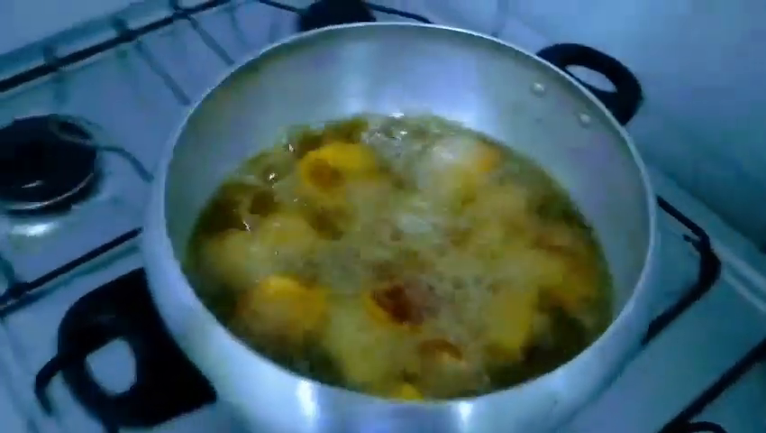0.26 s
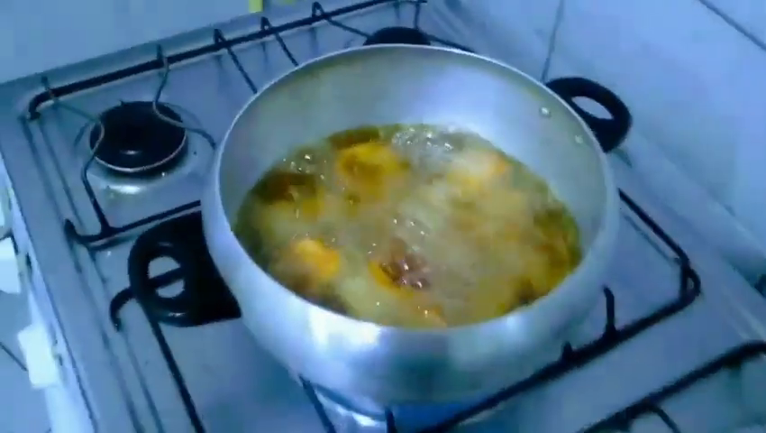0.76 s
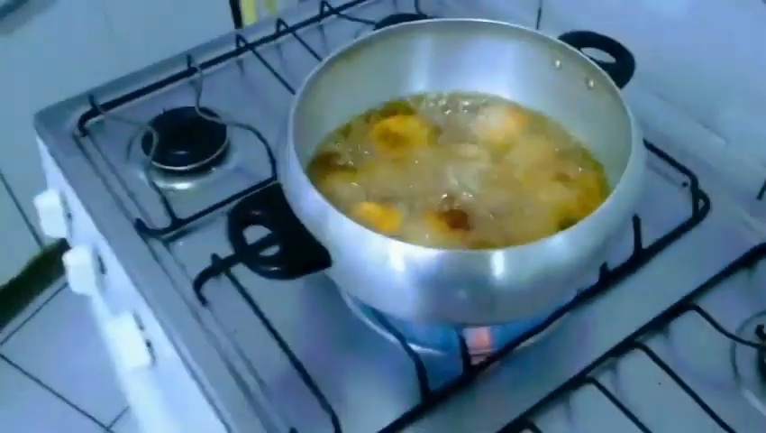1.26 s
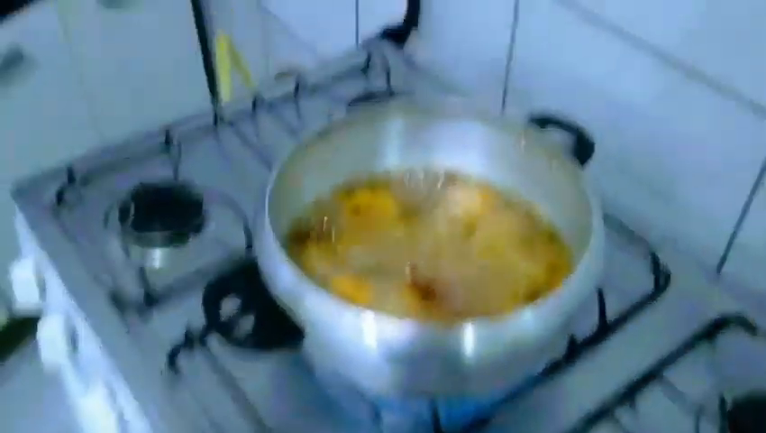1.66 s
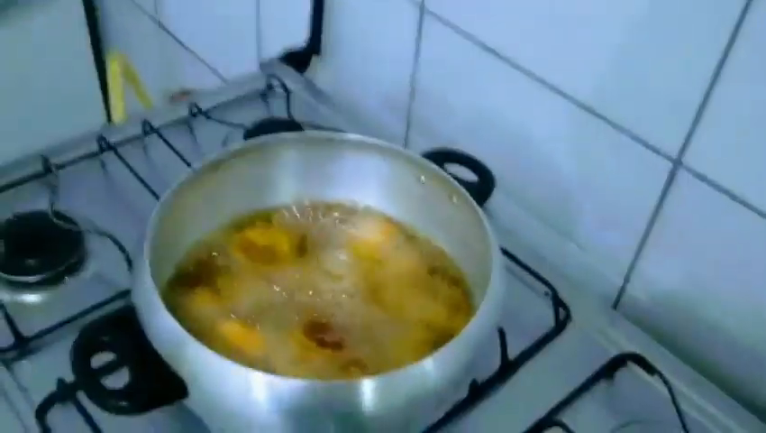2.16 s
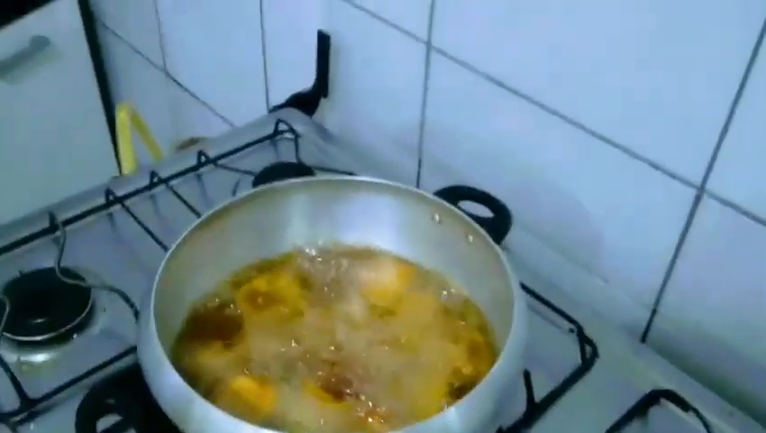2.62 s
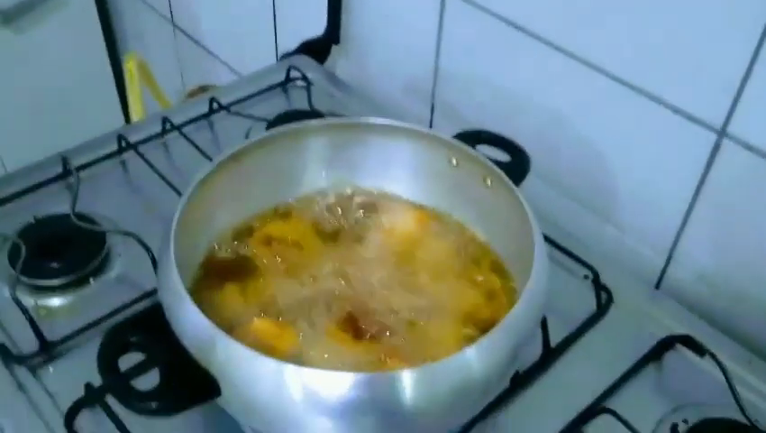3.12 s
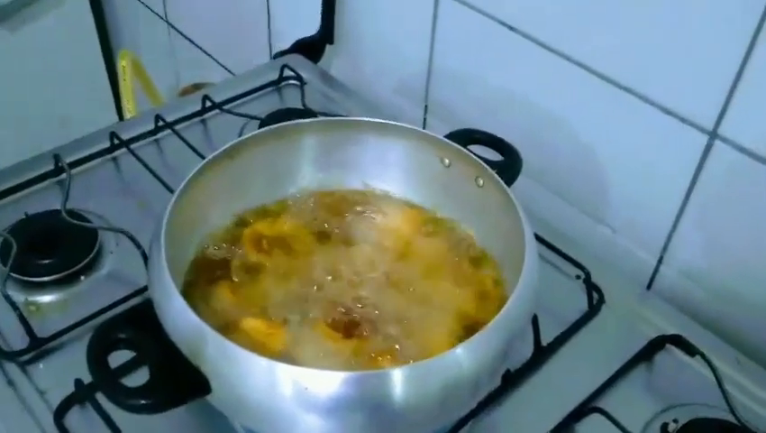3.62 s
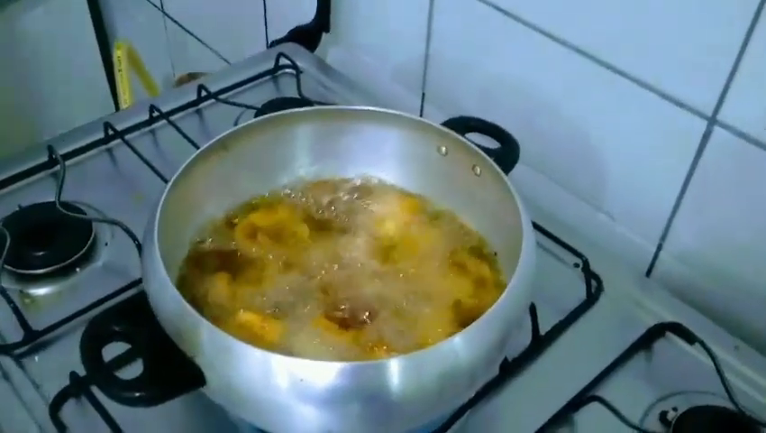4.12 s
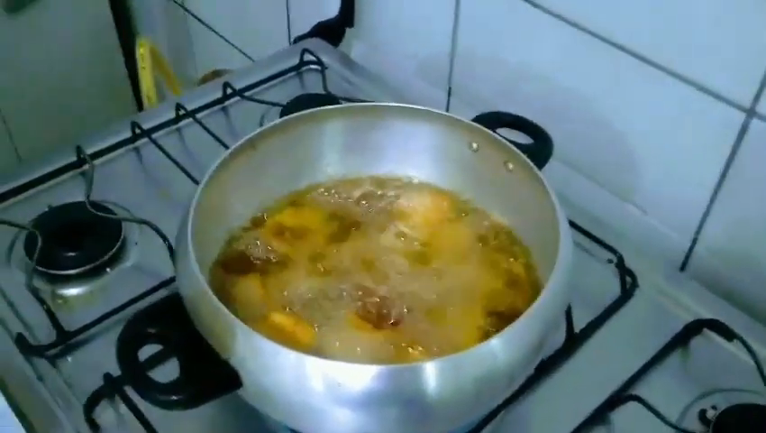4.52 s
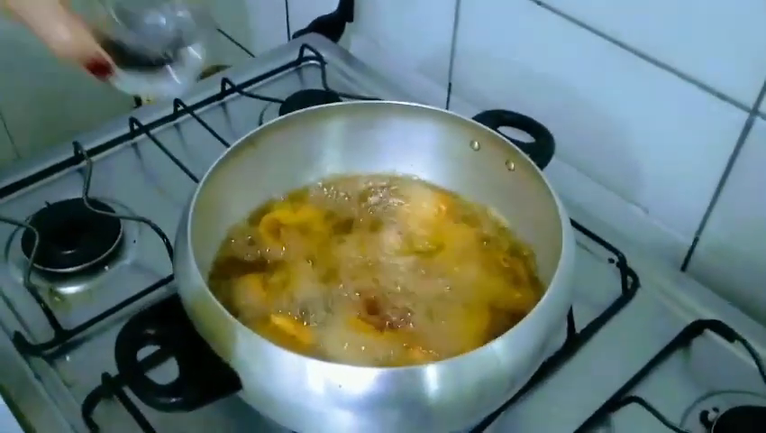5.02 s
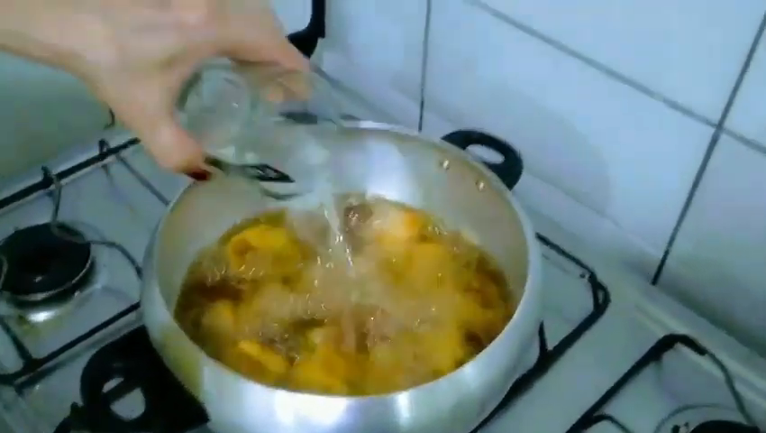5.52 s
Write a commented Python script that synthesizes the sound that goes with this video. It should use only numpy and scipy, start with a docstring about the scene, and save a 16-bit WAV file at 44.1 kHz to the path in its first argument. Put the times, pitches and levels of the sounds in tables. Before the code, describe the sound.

Chunks of food fry vigorously in a deep metal pot on a home stove. Constant bright sizzle and dense fine crackle carry snapping pops and hollow, wet bubbling. A faint metallic ring fades at the start. Near the end water is poured in and the frying jumps to a louder hiss and gurgle. Close handheld stereo microphones, treble-limited, with slight handling bumps and short tiled-wall reflections.

```python
"""Food fries in a deep metal pot: steam bubbles of every size burst in the oil, small ones crackle, large ones gurgle.
Noise bands and swarms of short decaying tones make the sizzle; listed bursts make the loud pops and gulps.
A struck metal rim, a set of wavering partials, still rings at the start; at the end water is poured in
and flashes to hissing steam. Around it lie kitchen rumble, mains hum and handling bumps.
Two spaced microphones of opposite polarity hear it from either side, some 15 cm of sound path apart."""
import sys
import numpy as np
from scipy import signal
from scipy.fft import rfft, irfft, next_fast_len
from scipy.io import wavfile
from scipy.ndimage import uniform_filter1d, map_coordinates

SR = 44100
rng = np.random.default_rng(int(sys.argv[2]) if len(sys.argv) > 2 else 0)


def store_pcm(level_fs):
    """Save levels as 16-bit WAV."""
    pcm = np.round(np.clip(level_fs, -1, 1) * 32767).astype(np.int16)
    wavfile.write(sys.argv[1], SR, np.atleast_2d(pcm).T)


def nominal_scale(level):
    """Amplitude ratio for a level in decibels (scalar or array-like)."""
    x = np.asarray(level, float) / 20
    return 10 ** x


N = 254592
T = np.arange(N) / SR  # clock/s


def along(points, hz):
    """Interpolates (f/Hz, value) points on a log frequency axis."""
    f, v = np.transpose(points)
    return np.interp(np.log(hz + 1), np.log(f + 1), v)


def curves(rows):
    """One value per sample for each column after the time."""
    s, *cols = np.transpose(rows)
    return [np.interp(T, s, c) for c in cols]


def unit(x):
    """Brings a signal to rms 1."""
    return x / np.sqrt(np.mean(x ** 2) + 1e-20)


def filtered(x, response):
    """Multiplies the spectrum of x by a complex response of frequency."""
    m = next_fast_len(N + 8192)
    return irfft(rfft(x, m) * response(np.fft.rfftfreq(m, 1 / SR)), m)[..., :N]


def wobble(rate):
    """A smooth random curve, rate knots a second."""
    return map_coordinates(rng.standard_normal(size=300), [T * rate])


def surge(since, length, attack_s, sag_db, release_db_per_s):
    """Gain at times since a start: quick rise, sagging hold, release."""
    sag = sag_db * (.5 - np.clip(since / length, 0, 1))
    release = release_db_per_s * np.maximum(since - length, 0)
    return np.clip(since / attack_s, 0, 1) * nominal_scale(sag - release)


def rush(spectrum, patchy_db):
    """Two noises, one from each side, shaped and brought to rms 1 together, with shared patches of random gain."""
    z = signal.stft(rng.standard_normal((2, N)), nperseg=512)[2]
    field = uniform_filter1d(rng.standard_normal(z.shape[1:]), size=6, axis=0)
    field = uniform_filter1d(field, size=8, axis=1)
    pair = signal.istft(z * nominal_scale(patchy_db * unit(field)), nperseg=512)[1][:, :N]
    return unit(filtered(pair, lambda hz: nominal_scale(along(spectrum, hz))))


def bursts(s, gain, hz, cycles, glide, size):
    """Each bubble's envelope swells to its gain in so many cycles, then dies while its pitch climbs."""
    turns = np.arange(size) / SR * hz[:, None]
    life = turns / np.reshape(cycles, (-1, 1))  # 1 at the peak
    envelope = gain[:, None] * (life * np.exp(1 - life)) ** 0.82
    wave = envelope * np.sin(2 * np.pi * turns * (1 + glide * life))
    where = (s * SR).astype(int)[:, None] + np.arange(size)
    return np.bincount(where.ravel(), wave.ravel(), N + SR)[:N]


def swarm(count, hz, octaves, spread_db, cycles, size):
    """Bubbles at random moments from both sides, bell-shaped in log pitch, some louder than the rest."""
    sides = []
    for when, pitch, luck in rng.random((2, 3, count)):
        bell = np.log(pitch / (1 - pitch) + 1e-9) / 2
        loud = nominal_scale(spread_db * np.minimum(-np.log(1 - luck), 3.8))
        tune = hz * 2 ** (0.7 * np.tanh(octaves * bell / 0.7))  # stays within 0.7 octave
        sides.append(bursts(when * N / SR, loud, tune, cycles, 0.016, size))
    return unit(np.array(sides))


def tones(lines, waver_db, blur):
    """Sine partials whose strength (dB) and phase (blur, radians) waver at 40 knots a second."""
    knots = rng.standard_normal((2, len(lines), 240))
    swell, drift = [[map_coordinates(k, [T * 40]) for k in rows] for rows in knots]
    total = 0
    for (hz, db), a, b in zip(lines, swell, drift):
        total = total + nominal_scale(db + waver_db * a) * np.sqrt(2) * np.sin(2 * np.pi * hz * T + blur * b)
    return total


# mains hum: f/Hz, level/dB rms
HUM = [(120, -83.5), (205, -74.5), (240, -68), (360, -71.5)]


def hum():
    """Faint steady partials of mains hum, barely wavering."""
    return tones(HUM, waver_db=1.2, blur=0.25)


# spectrum shape of room rumble and burner: f/Hz, relative level/dB per Hz
KITCHEN = [(15, -50), (25, -16), (70, -29), (157, -15), (190, -7.5), (230, -3), (275, -1), (372, -1.5),
           (505, -15.5), (600, 11), (780, -29), (1320, -120)]
KITCHEN_DB = -53.5  # rms


def kitchen():
    """Room rumble and burner: low noise with patchy strength."""
    return nominal_scale(KITCHEN_DB) * rush(KITCHEN, patchy_db=5.5)


# the microphones knocked in the hand: t/s, level/dB
BUMPS = [(0.0, -47), (.49, -46)]
# spectrum shape of handling noise: f/Hz, relative level/dB per Hz
THUMP = [(20, -34), (60, -30), (120, -14), (146, 3.5), (175, -8), (300, -31.5)]
BUMP_RISE_S, BUMP_DB_PER_S, HAND_DB = 0.0082, 118, -80


def hand():
    """A faint rumble of the holding hand, with two bumps that rise fast and fall away."""
    s, db = np.transpose(BUMPS)[:, :, None]
    bumps = nominal_scale(db) * surge(T - s, BUMP_RISE_S, BUMP_RISE_S, 0, BUMP_DB_PER_S)
    rumble = nominal_scale(HAND_DB + 7.5 * wobble(rate=9.7))
    return (rumble + bumps.sum(0)) * rush(THUMP, patchy_db=1.0)


# decay of the tiled walls: f/Hz, t60/s
WALLS = [(300, 0.03), (2000, 0.14), (10000, 0.027)]


def walls(x):
    """Tiled walls answer with decaying noise; each frequency dies at its own speed."""
    hz, t, z = signal.stft(rng.standard_normal((2, SR // 2)), SR, nperseg=256)
    fade = nominal_scale(-60 * t / along(WALLS, hz)[:, None])
    tail = signal.istft(z * fade, SR, nperseg=256)[1]
    return signal.fftconvolve(x[None], tail / np.linalg.norm(tail[0]), axes=1)[:, :N]


# partials of the ringing rim: f/Hz, level/dB rms under RIM_DB
RIM = [(5954, -66), (6067, -69), (6202, -52), (6800, -62), (7327, -67), (7762, -47), (8150, -51),
       (9760, -48.5), (10207, -61), (11620, -56), (11698, -51), (11822, -62), (13760, -59), (13840, -52),
       (13970, -59), (14200, -64), (14690, -59), (14750, -53), (15294, -65)]
RIM_DB, RIM_SAG_DB_PER_S = 6, 40
RIM_DAMPED_S, RIM_DAMPED_DB_PER_S = 0.22, 290  # damping adds to the sag


def rim():
    """The rim's partials ring on, dying slowly, until damping adds a fast decay."""
    damping_db = RIM_DAMPED_DB_PER_S * np.maximum(T - RIM_DAMPED_S, 0)
    fade_db = RIM_DB - RIM_SAG_DB_PER_S * T - damping_db
    return nominal_scale(fade_db) * tones(RIM, waver_db=5, blur=0.7)


FLARE_ATTACK_S, FLARE_RELEASE_DB_PER_S = 0.0052, 383
# oil thrown against the pot wall: start t/s, length t/s, level/dB rms before the flutter
SPLASHES = [(3.383, 0.1, -35.5), (4.019, 0.049, -31.5), (4.744, 0.082, -38.5), (5.638, 0.2, -32.5)]
# spectrum shape of the splashes: f/Hz, relative level/dB per Hz
SPLASH = [(350, -26), (600, -6.5), (1700, -11), (2300, -2.5), (3200, 10), (4500, -13), (6500, -35)]


def splashes():
    """Broad fluttering spatter off the pot wall, unlike at the two microphones."""
    s, length, db = np.transpose(SPLASHES)[:, :, None]
    gain = nominal_scale(db) * surge(T - s, length, FLARE_ATTACK_S, 0, FLARE_RELEASE_DB_PER_S)
    return gain.sum(0) * nominal_scale(3.8 * wobble(rate=53)) * rush(SPLASH, patchy_db=1.5)


POUR_S = 5.498  # water meets oil
POUR_FIRST_DB, POUR_FULL_S = -8.5, 0.11  # the first hiss under the full one, reached later


def pour(full_db, db_per_s=0):
    """Gain of a layer that the poured water sets off: sudden start, climb to full, then drift."""
    since = T - POUR_S
    climb_db = POUR_FIRST_DB * np.clip(1 - since / POUR_FULL_S, 0, 1)
    drift_db = db_per_s * np.maximum(since - POUR_FULL_S, 0)
    return np.clip(since / FLARE_ATTACK_S, 0, 1) * nominal_scale(full_db + climb_db + drift_db)


# spectrum shape of water flashing to steam: f/Hz, relative level/dB per Hz
STEAM = [(3530, -49), (6000, -6), (7460, -2), (8620, -7.5), (13500, -12), (14500, -17), (15700, -16)]
POUR_STEAM_DB, POUR_STEAM_DB_PER_S = -33.5, -27  # before the two mixing gains


def steam():
    """The poured water hisses: near the pot from either side, and scattered by the kitchen."""
    gain = pour(POUR_STEAM_DB, POUR_STEAM_DB_PER_S)
    near = gain * 0.53 * rush(STEAM, patchy_db=-5.0)
    scattered = gain * 1.18 * rush(STEAM, patchy_db=-1.5)
    return near, scattered


# trains of one-size steam bubbles rising from the food, before the pot body:
# start t/s, length t/s, level/dB rms, f/Hz
TRAINS = [(0, 0.065, -45.5, 398), (0, 0.27, -39.5, 696), (0, 0.25, -36.5, 1158), (0.1, 0.14, -45.5, 396),
          (0.162, 0.029, -32.5, 688), (0.267, 0.14, -37.5, 727), (0.319, 0.27, -41, 1111),
          (0.387, 0.31, -41.5, 394.2), (0.437, 0.15, -35.5, 681), (0.507, 0.17, -35.5, 1101),
          (0.602, 0.13, -41, 1177), (0.664, 0.18, -43.5, 398.3), (0.73, 0.045, -44, 814),
          (0.736, 0.039, -34.5, 1167), (0.793, 0.2, -49.5, 729), (0.809, 0.16, -33, 1140),
          (0.876, 0.17, -43.5, 390), (0.954, 0.08, -36, 670), (0.971, 0.054, -31.5, 1140.0),
          (1.063, 0.19, -37, 1206), (1.159, 0.05, -34, 736), (1.277, 0.11, -53, 331),
          (1.293, 0.21, -37, 1114), (1.346, 0.1, -33.5, 1092), (1.457, 0.22, -30.5, 1142),
          (1.476, 0.15, -33.5, 852), (1.709, 0.13, -28, 1036), (1.771, 0.16, -40, 812),
          (1.851, 0.14, -32.5, 1074), (1.973, 0.18, -36.5, 781), (2.032, 0.28, -36, 1098),
          (2.064, 0.1, -46.5, 370), (2.196, 0.091, -40.5, 714), (2.214, 0.047, -47, 366),
          (2.343, 0.16, -35.5, 1238), (2.358, 0.15, -51.5, 378), (2.373, 0.087, -36.5, 732),
          (2.536, 0.056, -38, 688), (2.577, 0.04, -37, 1160), (2.686, 0.04, -41, 761),
          (2.712, 0.019, -31.5, 1250), (2.774, 0.049, -42, 685), (2.812, 0.05, -39.5, 1140.0),
          (2.84, 0.043, -55.5, 378), (2.858, 0.044, -40, 716), (2.889, 0.042, -37.5, 1190),
          (2.946, 0.014, -37.5, 757), (3.028, 0.047, -48, 362.5), (3.033, 0.12, -36, 1167),
          (3.038, 0.018, -42, 730), (3.202, 0.064, -43, 1236), (3.207, 0.041, -41, 676),
          (3.39, 0.068, -32, 699), (3.404, 0.028, -32, 1062), (3.521, 0.06, -33, 1174),
          (3.539, 0.1, -35.5, 709), (3.61, 0.059, -37.5, 1180), (3.737, 0.13, -35, 1175),
          (3.769, 0.05, -38, 722), (3.888, 0.034, -43, 760), (3.893, 0.12, -37, 1107),
          (4.006, 0.081, -49, 438), (4.01, 0.13, -36, 1123), (4.036, 0.038, -37, 688),
          (4.188, 0.053, -40, 680), (4.279, 0.17, -38.5, 1172), (4.28, 0.052, -58, 331),
          (4.495, 0.13, -48, 1046), (4.521, 0.071, -40.5, 747), (4.641, 0.057, -43, 1170),
          (4.736, 0.021, -40.5, 659), (4.743, 0.024, -36, 1157), (4.809, 0.26, -39, 1150),
          (4.833, 0.056, -39.5, 760), (4.985, 0.022, -35.5, 733), (5.097, 0.031, -31.5, 1113),
          (5.09, 0.051, -35.5, 736), (5.098, 0.056, -59, 400), (5.185, 0.058, -45, 980),
          (5.201, 0.058, -39.5, 751), (5.258, 0.027, -33.5, 984), (5.325, 0.068, -38.5, 735),
          (5.33, 0.14, -39, 1093), (5.417, 0.025, -36, 748), (5.548, 0.29, -37, 751),
          (5.659, 0.16, -53, 802)]
TRAIN_ATTACK_S, TRAIN_SAG_DB, TRAIN_RELEASE_DB_PER_S = 0.0057, 4, 300  # sag over the length of a train
BUBBLES_PER_CYCLE, BUBBLE_OCTAVES, BUBBLE_SPREAD_DB = .42, 0.1454, 1.5  # small bubbles come faster


def trains(cycles, count):
    """Each train lets off bubbles at random gaps around its pitch, once for each side."""
    s, length, db, hz = np.transpose(TRAINS)[:, :, None]
    sides = []
    for gap, pitch, luck in np.moveaxis(rng.random((len(TRAINS), 2, 3, count)), 0, 2):
        since = np.cumsum(-np.log(1 - gap), axis=1) / (BUBBLES_PER_CYCLE * hz)
        gain = surge(since, length, TRAIN_ATTACK_S, TRAIN_SAG_DB, TRAIN_RELEASE_DB_PER_S)
        loud_db = db + BUBBLE_SPREAD_DB * (-np.log(1 - luck) + 0.5)
        loud = gain * nominal_scale(loud_db) / np.sqrt(BUBBLES_PER_CYCLE * cycles)  # allows for overlap
        bell = np.log(pitch / (1 - pitch) + 1e-9) / 2
        tune = hz * 2 ** np.clip(BUBBLE_OCTAVES * bell, -1, 1)
        heard = (gain > .1) & (s + since < N / SR)
        sides.append(bursts((s + since)[heard], loud[heard], tune[heard], cycles, 0.0075, size=2000))
    return np.array(sides)


# large bubbles bursting, before the pot body: t/s, peak level/dB, f/Hz
GULPS = [(0.275, -29.5, 660), (0.312, -20, 730), (0.333, -18, 1050), (0.52, -13.5, 1045),
         (0.615, -20.5, 1170), (0.822, -21.5, 1140), (0.855, -14.5, 1130), (0.937, -31, 1200),
         (0.9924, -14, 1130), (1.084, -21, 1210), (1.168, -22.5, 680), (1.283, -26, 1200),
         (1.301, -15, 1110), (1.36, -24, 930), (1.462, -22, 1020), (1.489, -28, 930), (1.72, -14.5, 965),
         (1.981, -36, 855), (2.064, -14, 1180), (2.076, -18, 1020), (2.184, -23, 1180), (2.238, -19, 1490),
         (2.354, -13.5, 1330), (2.689, -34, 830), (2.726, -13.5, 1230), (2.783, -30, 654),
         (2.953, -22, 813), (3.044, -28, 730), (3.414, -31, 613), (3.526, -20.5, 1320), (3.55, -21.5, 750),
         (3.622, -21, 1190), (3.742, -19, 1320), (3.902, -22, 1090), (3.921, -22, 1110),
         (4.085, -13.5, 1280), (4.201, -26, 653), (4.291, -21, 1200), (4.502, -24.5, 950),
         (4.817, -25, 1095), (4.848, -20, 1120), (4.755, -24, 1140), (4.946, -21, 1250), (4.947, -28, 1720),
         (5.025, -24, 1200), (5.003, -26, 740), (5.102, -34, 870), (5.123, -24, 860), (5.204, -23.5, 950),
         (5.257, -17.5, 950), (5.334, -21.5, 735), (5.347, -18.5, 1160), (5.431, -23, 1054),
         (5.504, -19.5, 1340), (5.553, -17.5, 1220), (5.592, -11.5, 1470)]
# air entering the tipped glass, before the pot body: t/s, peak level/dB, f/Hz
GLUGS = [(5.548, -41, 291), (5.574, -45.5, 245)]


def gulps():
    """Large bubbles and the glass's glugs: low bursts that die within a few cycles."""
    s, db, hz = np.transpose(GULPS + GLUGS)
    return bursts(s, nominal_scale(db), hz, cycles=1.75, glide=0.00077, size=3000)


# large bubbles that ring on as a clear note, before the pot body: t/s, peak level/dB, f/Hz
RINGERS = [(0.002, -32.5, 703), (0.435, -37, 453), (0.606, -46, 390), (0.685, -35, 389.3),
           (0.759, -39.5, 402), (0.82, -43, 381.4), (0.919, -39, 377.3), (1.07, -27, 1210),
           (1.361, -23.5, 994), (1.47, -20, 870), (1.488, -16.5, 787), (1.599, -35, 1157),
           (1.722, -17.5, 1054), (1.735, -22.5, 997), (1.735, -39, 584), (1.79, -24, 1096),
           (1.81, -24, 786), (1.87, -24.5, 1008), (1.886, -30.5, 784), (1.974, -26.5, 1077),
           (1.982, -26, 837), (2.443, -38.5, 756), (2.56, -35.5, 632), (3.038, -37.5, 709),
           (4.412, -27.5, 1184), (5.378, -28, 1170), (5.645, -36, 1175), (5.716, -41, 1000)]


def ringers():
    """Lightly damped large bubbles: the same burst held over many cycles."""
    s, db, hz = np.transpose(RINGERS)
    return bursts(s, nominal_scale(db), hz, cycles=11.8, glide=0.0014, size=5000)


# low tones from the pot body: f/Hz, left lead/rad before the factors in boiling()
POT_LEAD = [(260, 1.46), (520, 0.93), (800, 0.53), (1100, 0.15), (1200, -0.09), (1450, -0.61)]
# what the pot passes of the boiling: f/Hz, level/dB
POT_BODY = [(150, -11), (260, 1), (600, -3.5), (1400, -5.5), (1600, -32), (2100, -30)]
SIMMER_SMALL_DB, SIMMER_LARGE_DB, SIMMER_SWELL_DB = -49, -52, 5.5  # gurgling between the trains
POUR_GURGLE_DB = -29


def boiling():
    """Trains of bubbles over a swelling simmer, and the loud gulps among them, carried by the pot body."""
    small = swarm(count=2600, hz=1140, octaves=0.26, spread_db=1.0, cycles=2.9, size=900)
    large = swarm(count=1800, hz=774, octaves=0.194, spread_db=5.5, cycles=4.6, size=1400)
    small_gain = nominal_scale(SIMMER_SMALL_DB + SIMMER_SWELL_DB * wobble(rate=8))
    small = small * np.hypot(small_gain, pour(POUR_GURGLE_DB))
    large = nominal_scale(SIMMER_LARGE_DB + SIMMER_SWELL_DB * wobble(rate=18)) * large
    direct, scattered = small + large + trains(cycles=2.54, count=200)
    direct = direct + gulps() + ringers()

    def lead(hz):
        return along(POT_LEAD, hz) / 2  # half on each side

    # the direct part is phase-shifted between the sides, the scattered part enters them with opposite signs
    pair = filtered(direct, lambda hz: np.exp(.8j * lead(hz) * [[1], [-1]]))
    pair = pair + filtered(scattered, lambda hz: 0.54 * lead(hz) * [[1], [-1]])
    return filtered(pair, lambda hz: nominal_scale(along(POT_BODY, hz)))


# the loudest small bubbles bursting: t/s, peak level/dB, f/Hz
POPS = [(0.063, -24, 3680), (0.0922, -19.5, 3370), (0.3525, -11.5, 3750), (0.382, -12, 3780),
        (0.43, -17, 4900), (0.4873, -11, 3550), (0.5305, -14, 3670), (0.544, -16, 3740), (0.565, -11, 3660),
        (0.619, -22, 5630), (0.636, -15.5, 3200), (0.6707, -12.5, 3740), (0.6845, -12, 3800),
        (0.749, -14, 4100), (0.7528, -12, 5040), (0.7675, -5, 3560), (0.7821, -13, 3700),
        (0.791, -23, 3600), (0.8128, -10, 3700), (0.8797, -10.5, 3650), (0.9063, -14, 3520),
        (0.964, -16, 5540), (0.9711, -17, 5050), (0.9926, -15, 3850), (1.03, -25, 7700),
        (1.1193, -20, 7900), (1.055, -14, 3660), (1.136, -17, 3700), (1.213, -27, 3480), (1.275, -15, 3630),
        (1.278, -13.5, 3600), (1.318, -14, 4060), (1.3378, -9.5, 4200), (1.3443, -21, 3400),
        (1.383, -20, 3440), (1.4117, -21.5, 8200), (1.4314, -19.5, 3620), (1.4586, -18, 5400),
        (1.474, -16.5, 5270), (1.519, -20, 2520), (1.522, -19, 2900), (1.606, -16, 4800), (1.72, -15, 4960),
        (1.7485, -12, 3590), (1.856, -19, 5400), (1.94, -15, 3460), (1.9642, -16, 5500), (1.999, -15, 6660),
        (2.0154, -14.5, 6170), (2.062, -21.5, 3240), (2.1662, -11.5, 3560), (2.1677, -13.5, 2740),
        (2.1802, -16, 3450), (2.2385, -14.5, 5000), (2.265, -30, 5600), (2.281, -16, 5530),
        (2.288, -15, 5560), (2.3147, -18, 5130), (2.381, -21.5, 2720), (2.44, -19, 4060),
        (2.457, -14.5, 4170), (2.537, -21.5, 11000), (2.546, -15, 3800), (2.5786, -18, 6760),
        (2.606, -13.5, 5060), (2.657, -16.5, 5740), (2.6905, -17.5, 3480), (2.7843, -17.5, 3380),
        (2.807, -28, 3370), (2.939, -17, 4100), (3.046, -20, 3180), (3.093, -18.5, 7040),
        (3.168, -25, 2660), (3.182, -19, 2920), (3.227, -9.5, 4200), (3.3892, -15.5, 3600),
        (3.4345, -18.5, 2640), (3.5061, -20, 3200), (3.5321, -19.5, 5800), (3.5977, -21.5, 5700),
        (3.615, -21, 5160), (3.632, -13, 5500), (3.7, -22, 5540), (3.7138, -20, 2930), (3.745, -15, 5900),
        (3.744, -18, 2610), (3.849, -20.5, 3100), (3.8647, -22, 7840), (3.8666, -17, 4700),
        (3.895, -18, 3570), (3.925, -14, 4860), (4.023, -17.5, 2770), (4.0446, -23, 3280),
        (4.067, -12.5, 3970), (4.085, -28, 3080), (4.1077, -31, 7700), (4.134, -11.5, 6100),
        (4.2857, -24, 6010), (4.3635, -13, 6150), (4.479, -18, 4900), (4.537, -18.5, 5300),
        (4.546, -19.5, 3500), (4.5762, -20, 7050), (4.6352, -14.5, 5860), (4.6634, -16.5, 7700),
        (4.6914, -17, 3100), (4.758, -20, 2560), (4.759, -17, 3420), (4.784, -20, 7300),
        (4.799, -14.5, 2780), (4.845, -24, 8000), (4.903, -11.5, 6050), (4.943, -22, 7000),
        (4.9817, -14, 4070), (5.06, -15, 6140), (5.1421, -19, 5760), (5.2, -22, 5760), (5.22, -31, 7600),
        (5.2905, -28, 10900), (5.328, -27, 5200), (5.3509, -15, 3500), (5.414, -14.5, 5700),
        (5.454, -19, 4000), (5.4824, -18, 6140), (5.527, -17, 2620), (5.697, -21, 2880)]


def pops():
    """The pops that stand out of the sizzle, each ringing a little longer or shorter."""
    s, db, hz = np.transpose(POPS)
    cycles = 1.97 * 2 ** rng.uniform(-0.82, 0.25, len(s))
    return bursts(s, nominal_scale(db), hz, cycles=cycles, glide=0.0067, size=400)


WAKE_T60_S = 0.038


def wake():
    """Power of the droplets that fall back after each pop: an exponential decay from its peak power."""
    s, db, _ = np.transpose(POPS)
    kicks = np.bincount((s * SR).astype(int), nominal_scale(2 * db), N)
    decay = nominal_scale(-120 * np.arange(SR // 5) / SR / WAKE_T60_S)
    return np.abs(signal.fftconvolve(kicks, decay)[:N])


# frying surface before the water: t/s, crackle level/dB, sputter level/dB, fine spray level/dB
# (the last two are stretched slightly in surface())
SURFACE = [(0.0, -31.5, -34.5, -48), (0.15, -32.5, -35, -46), (0.35, -31.5, -43.5, -50),
           (1.14, -32.5, -48, -49.5), (1.19, -32, -39.5, -50), (1.49, -34.5, -56, -49),
           (1.54, -32, -40, -48.5), (2.31, -32, -41, -50), (2.63, -35.5, -63, -51.5),
           (3.19, -31.5, -51.5, -50.5), (3.33, -33, -65, -51), (3.42, -34.5, -47.5, -51.5),
           (3.82, -34.5, -51, -50), (3.98, -33, -70, -52.5), (4.04, -37, -38, -46.5),
           (4.18, -36, -50.5, -52), (4.49, -34, -64.5, -51), (4.94, -32.5, -43, -50),
           (5.08, -36.5, -59, -52), (5.46, -35, -48.5, -52)]
# brief flares of spattering: start t/s, length t/s, crackle level/dB, sputter level/dB
FLARES = [(0.644, 0.042, -30.5, -49), (0.754, .05, -53, -61), (1.128, 0.12, -30, -53),
          (1.506, 0.014, -30, -51), (1.926, 0.19, -36, -49), (2.144, 0.024, -31, -56),
          (2.254, 0.034, -41, -58), (2.78, 0.036, -32.5, -49), (3.03, 0.038, -44, -48),
          (3.384, 0.17, -37.5, -67), (3.727, 0.096, -30, -54), (4.014, 0.15, -33, -62),
          (4.566, 0.061, -45, -47.5), (4.652, 0.056, -35.5, -69), (4.747, 0.06, -40, -63)]
FLARE_SPRAY_DB = -26  # spray under the crackle
CRACKLE_SWELL_DB, SPUTTER_SWELL_DB, SPRAY_SWELL_DB = 0.82, 3.5, 1.12  # random swells, before the stretch
POUR_CRACKLE_DB, POUR_SPUTTER_DB, POUR_SPUTTER_DB_PER_S = -29.5, -32.5, 12  # drift once full
WAKE_CRACKLE_DB, WAKE_SPRAY_DB = -11.5, -36.5  # each pop throws up droplets: under its peak


def surface():
    """Gains of crackle, sputter and spray: level, swells, flares, droplets and poured water add in power."""
    crackle_db, sputter_db, spray_db = curves(SURFACE)
    s, length, flare_db, low_db = np.transpose(FLARES)[:, :, None]
    shape = surge(T - s, length, FLARE_ATTACK_S, 0, FLARE_RELEASE_DB_PER_S) ** 2
    flare = np.sum(shape * nominal_scale(2 * flare_db), 0)
    low_flare = np.sum(shape * nominal_scale(2 * low_db), 0)
    swell, drops = wobble(rate=15), wake()
    # 2 turns dB into power; slightly more also stretches the dB range
    crackle = nominal_scale(2 * (crackle_db + CRACKLE_SWELL_DB * swell)) + flare
    crackle = crackle + pour(POUR_CRACKLE_DB) ** 2 + nominal_scale(2 * WAKE_CRACKLE_DB) * drops
    sputter = nominal_scale(2.034 * (sputter_db + SPUTTER_SWELL_DB * wobble(rate=11))) + low_flare
    sputter = sputter + pour(POUR_SPUTTER_DB, POUR_SPUTTER_DB_PER_S) ** 2
    spray = nominal_scale(2.035 * (spray_db + SPRAY_SWELL_DB * (swell + wobble(rate=21))))
    spray = spray + nominal_scale(2 * FLARE_SPRAY_DB) * flare + nominal_scale(2 * WAKE_SPRAY_DB) * drops
    return np.sqrt([crackle, sputter, spray])


# spectrum shape of the fine spray: f/Hz, relative level/dB per Hz
HISS = [(4000, -82), (6500, 4.5), (8000, 3.5), (11000, -6.5), (13000, -11), (15000, -13), (15700, -34)]
HISS_PATCHY_DB = 2


def mist(spray_gain):
    """Spray scattered by the kitchen reaches each microphone on its own."""
    return spray_gain * 1.65 * rush(HISS, patchy_db=HISS_PATCHY_DB)


# spectrum shape of the sizzle bed: f/Hz, relative level/dB per Hz
SIZZLE = [(1700, -21), (2050, -4), (2250, 5.5), (2800, 16), (4000, 1.5), (6500, 10), (8000, -14),
          (9500, -41)]


def frying(crackle_gain, sputter_gain, spray_gain):
    """A bed of sizzle under crackle, lower sputter, and spray hissing with tiny ticks."""
    crackle = 0.54 * rush(SIZZLE, patchy_db=2.3)
    crackle = crackle + 0.85 * swarm(count=12000, hz=4658, octaves=0.38, spread_db=4, cycles=1.93, size=160)
    sputter = swarm(count=2200, hz=1600, octaves=0.3, spread_db=2.0, cycles=2.8, size=600)
    spray = 0.33 * rush(HISS, patchy_db=HISS_PATCHY_DB)
    spray = spray + swarm(count=7000, hz=8840, octaves=0.4, spread_db=2.8, cycles=2.6, size=80)
    return crackle_gain * crackle + sputter_gain * sputter + spray_gain * spray


# balance of the sides: f/Hz, share of power reaching the right microphone first
FROM_RIGHT = [(1000, 0.18), (4000, 0.67), (6000, 0.26), (8000, 0.27), (15000, 0.87)]


def microphones(sides, lone, lag_left_s=0.000413, lag_right_s=0.0004574):
    """Sound from one side reaches the far microphone late; the right microphone is wired in reverse."""
    def share(hz):
        return np.clip(along(FROM_RIGHT, hz), 0, 1)

    left, right = filtered(sides, lambda hz: np.sqrt([1 - share(hz), share(hz)]))
    left = left + lone  # pops and rim reach the left first
    lags = np.array([[lag_left_s], [lag_right_s]])
    late = filtered(np.array([right, left]), lambda hz: np.exp(-2j * np.pi * hz * lags))
    return np.array([left + late[0], -(right + late[1])]) * nominal_scale([[-.4], [.4]])


def scene():
    """The pot, the rim and the kitchen around them."""
    lone, gains, (near, scattered) = pops() + rim(), surface(), steam()
    echo = nominal_scale(-13) * walls(lone)
    pot = microphones(frying(*gains) + echo + near, lone)
    spatter = mist(gains[2]) + scattered + splashes()
    return pot + spatter + boiling() + kitchen() + hum() + hand()


def band_limit(x):
    """A steep low-pass at the top of the band."""
    return signal.sosfilt(signal.butter(12, 16310, fs=SR, output="sos"), x)


# microphone response and band limit: f/Hz, level/dB
MICROPHONE = [(10, -10), (60, 1.5), (150, -2.5), (300, -2.5), (15500, -0.5), (15900, -50)]


def record(dry):
    """The microphone response cuts the deepest bass and ends the treble just under 16 kHz."""
    mix = filtered(dry, lambda hz: nominal_scale(along(MICROPHONE, hz)))
    return band_limit(mix)


dry = scene()
out = record(dry)
store_pcm(out)
```